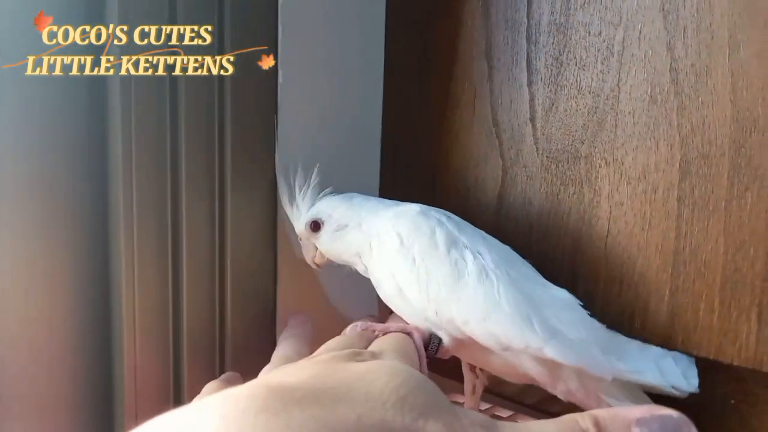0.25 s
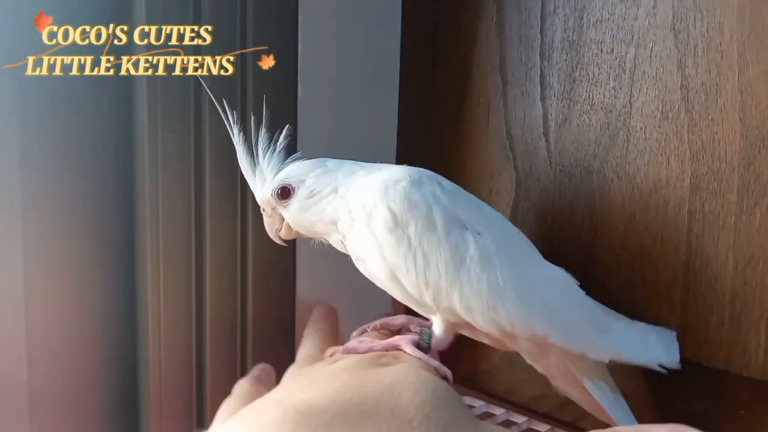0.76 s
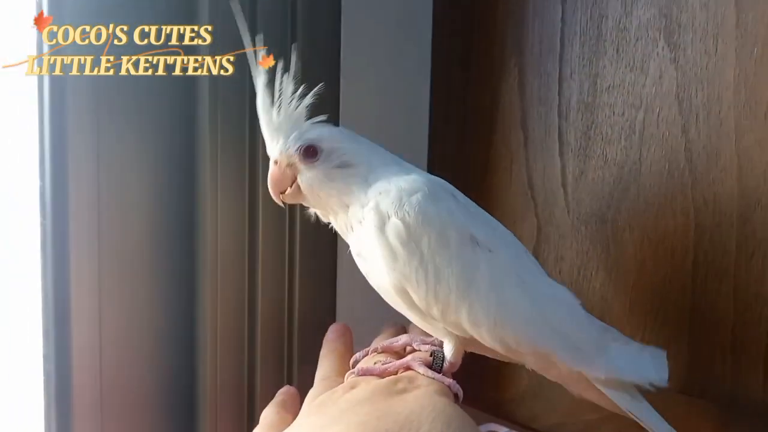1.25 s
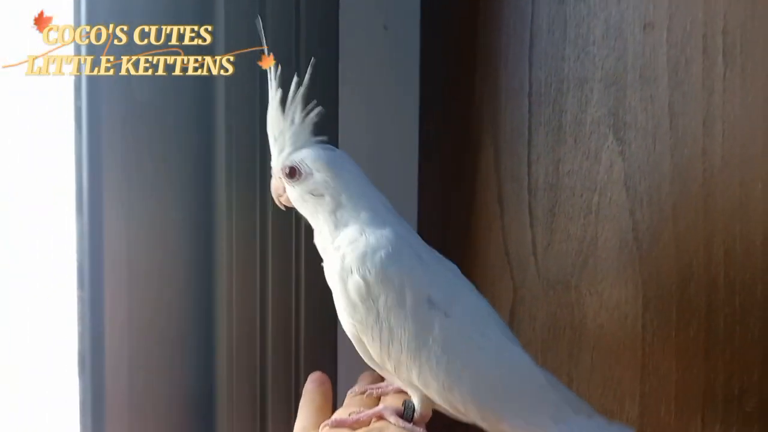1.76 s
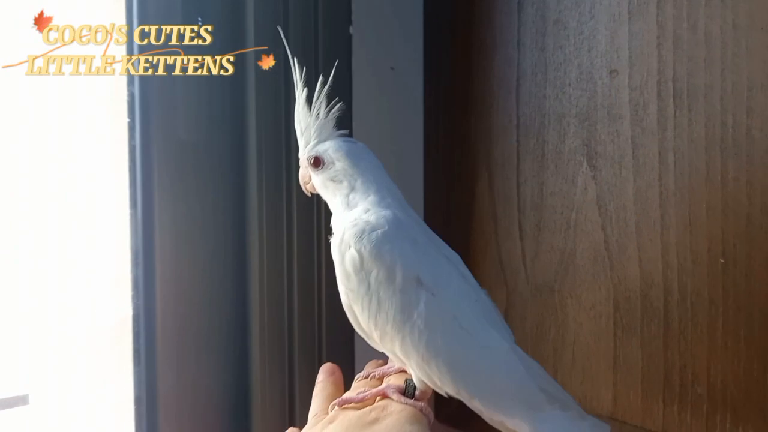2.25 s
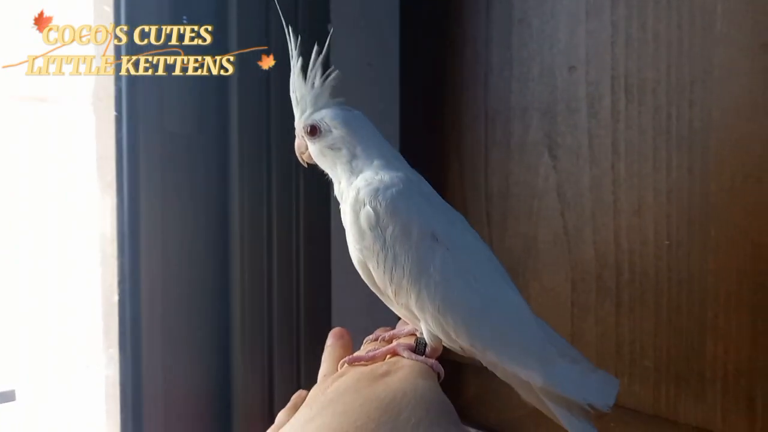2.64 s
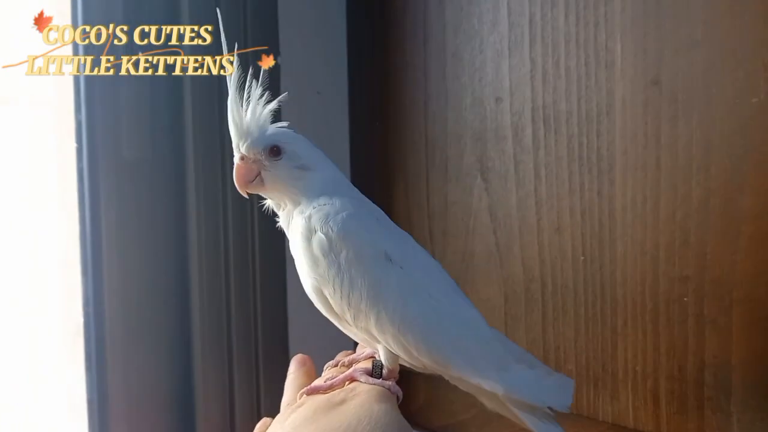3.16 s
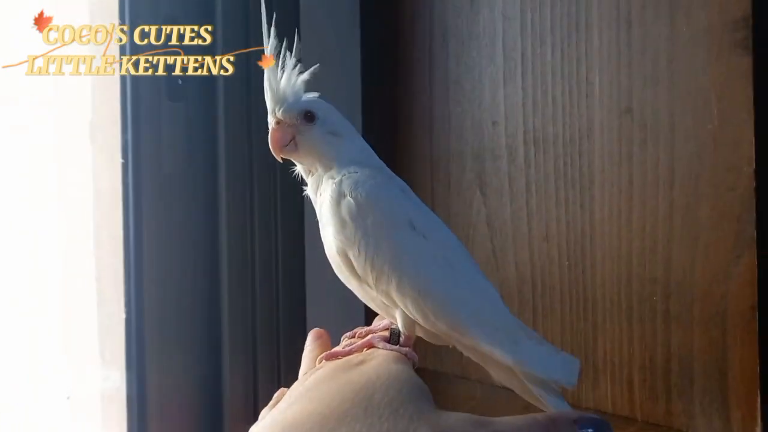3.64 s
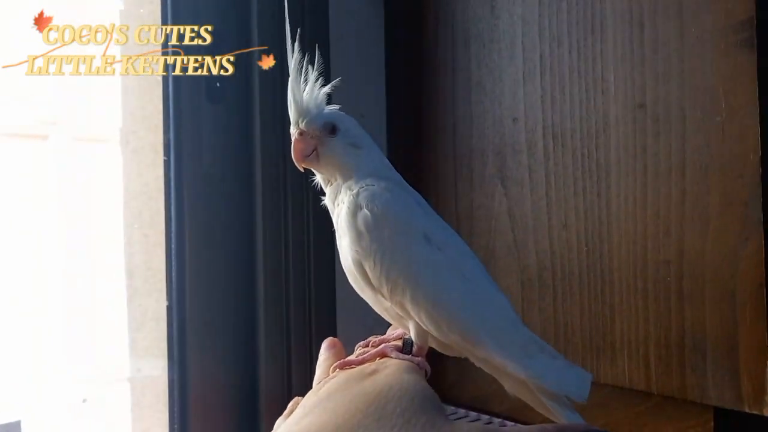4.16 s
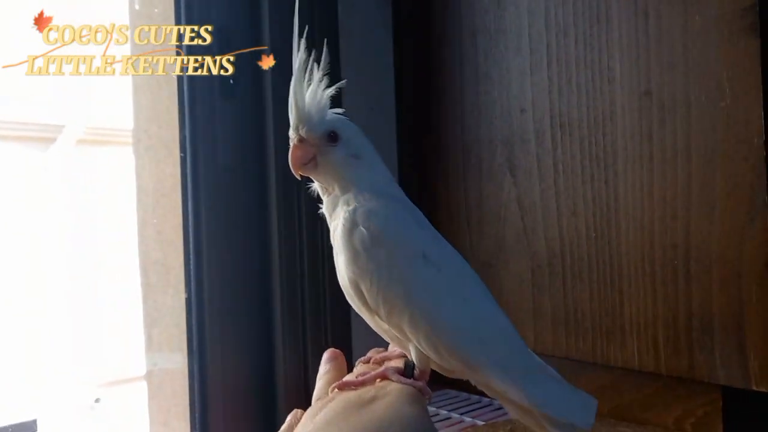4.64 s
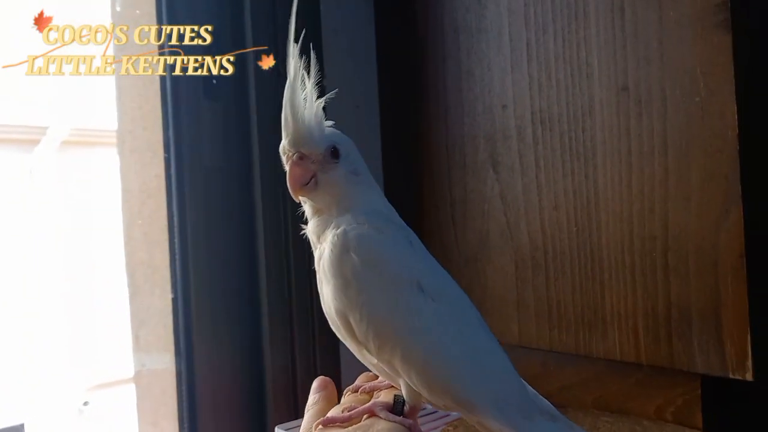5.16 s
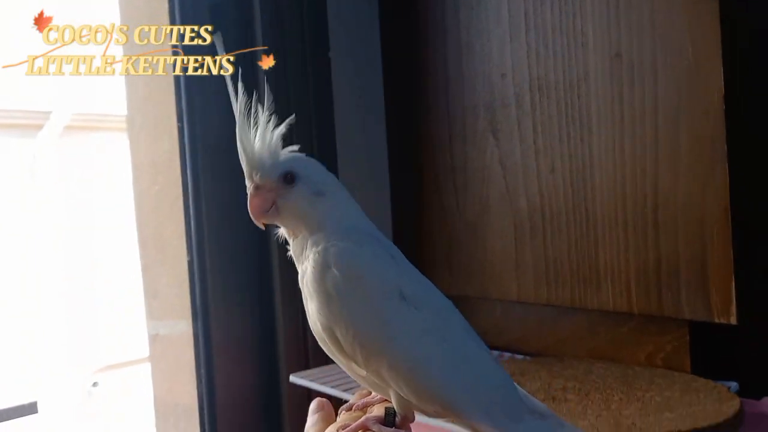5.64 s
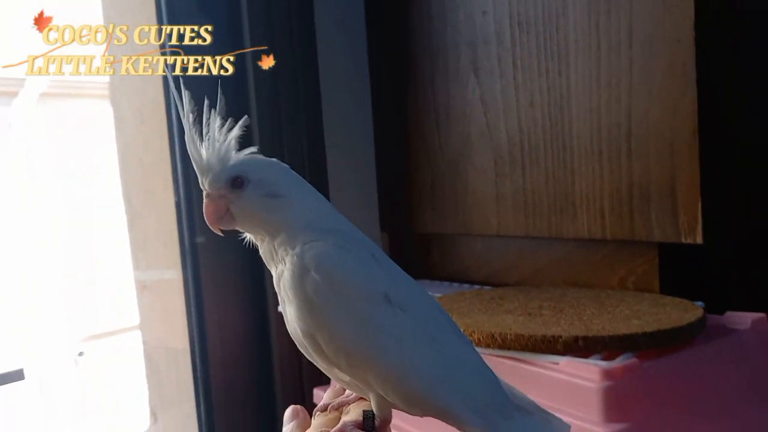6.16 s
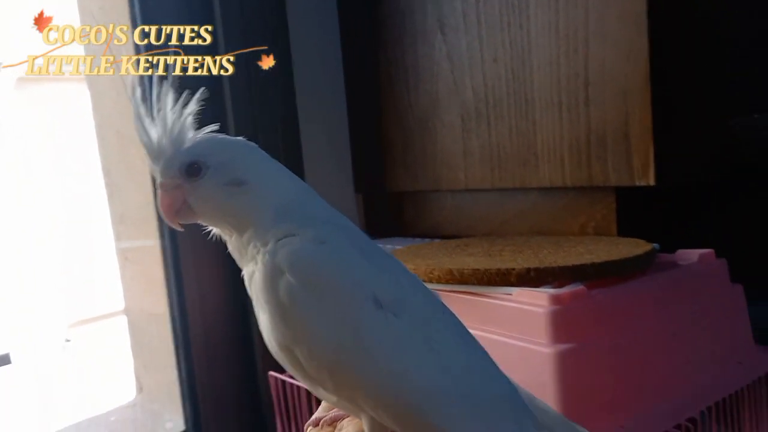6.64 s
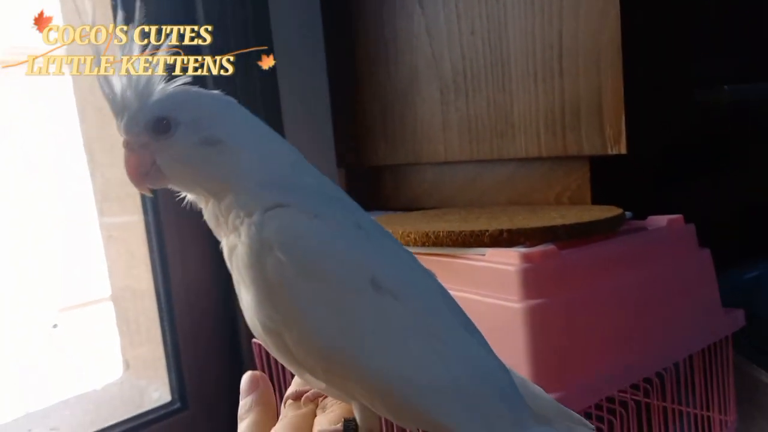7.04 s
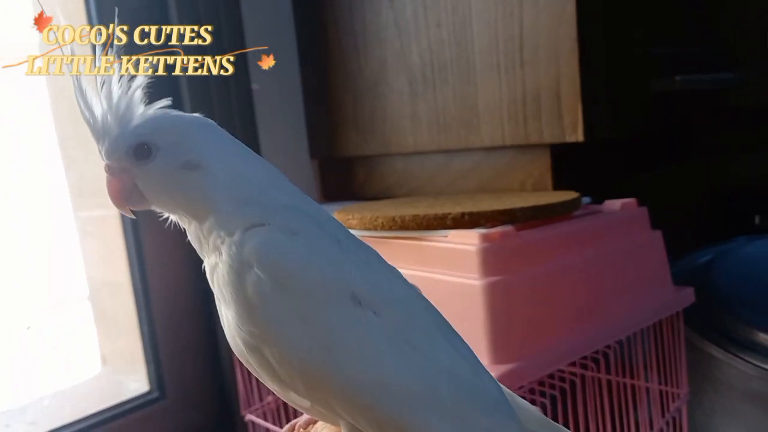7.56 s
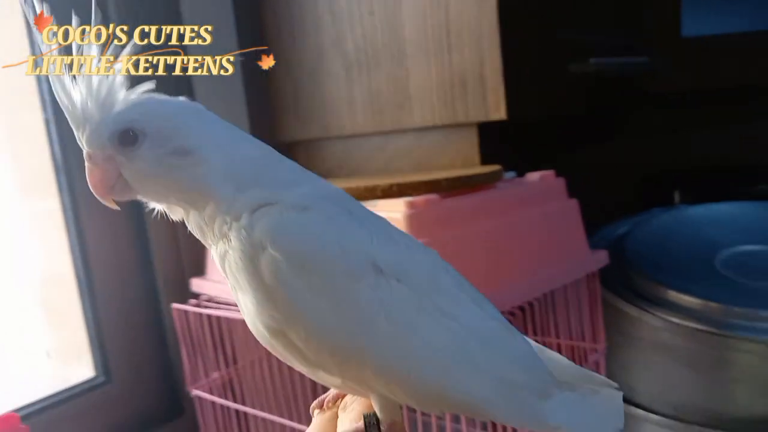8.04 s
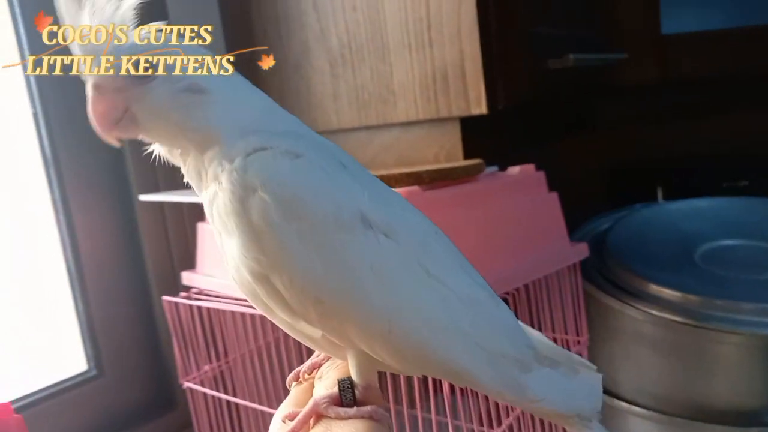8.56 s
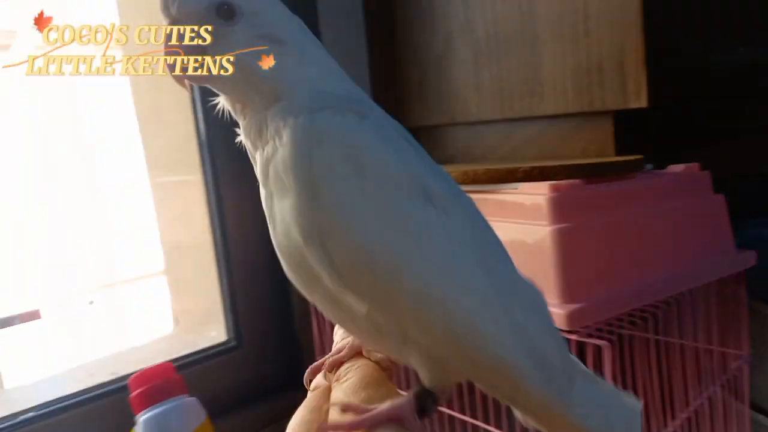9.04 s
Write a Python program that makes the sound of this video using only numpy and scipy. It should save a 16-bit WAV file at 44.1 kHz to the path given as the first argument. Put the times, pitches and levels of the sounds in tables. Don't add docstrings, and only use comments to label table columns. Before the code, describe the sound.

A low motor drone and soft street air fill a hard-walled room, with a few tiny claw scratches at first. Just after one second a close cockatiel starts giving short, loud whistles that sweep up and drop away, nine in all, each with a brief bright echo. The camera microphone dips the background under each call, then lets it swell back.

```python
import sys
import numpy as np
from scipy import signal
from scipy.fft import rfft, irfft, next_fast_len
from scipy.io import wavfile
from scipy.ndimage import uniform_filter1d, map_coordinates

SR = 44100
rng = np.random.default_rng(int(sys.argv[2]) if len(sys.argv) > 2 else 0)


def invert_db(level):
    return 10 ** (np.asarray(level, dtype=float) / 20)


def materialize(psi):
    bounded = np.clip(np.atleast_2d(psi).T, -1, 1)
    quanta = np.round(bounded * 32767).astype(np.int16)
    wavfile.write(sys.argv[1], SR, quanta)


N = 410130


def unit(x):
    return x / np.sqrt(np.mean(x ** 2) + 1e-20)


def along(points, hz):
    point_hz, value = np.transpose(points)
    return np.interp(np.log(hz + 1), np.log(point_hz + 1), value)


def curve(rows):
    return np.interp(np.arange(N) / SR, *np.transpose(rows))


def wobble(rate, count=N):
    knots = rng.standard_normal(count // 100)
    return map_coordinates(knots, [np.arange(count) * rate / SR])


def sides(db):
    return invert_db(np.array([db / 2, -db / 2])).reshape(2, -1)


def rush(response):
    # hz, likeness (-1 to 1)
    likeness = [(60, .995), (130, 0.9), (290, 0.86), (640, 0.54), (1400, -0.12), (15000, 0.038)]
    m = next_fast_len(N + 8192)
    hz = np.fft.rfftfreq(m, 1 / SR)
    turn = np.arccos(np.clip(along(likeness, hz), -1, 1)) / 2
    spectra = rfft(rng.standard_normal((2, m))) * response(hz)
    mid, side = irfft(spectra * [np.cos(turn), np.sin(turn)], m)[:, :N]
    return unit(np.array([mid + side, mid - side]))


def drone():
    # pitch_hz, width_hz, sill_level_db, pane_level_db, left_right_db
    resonances = [(57.3, 5.2, -44.5, -46, 0), (105.45, 4, -31.5, -27, 1.5), (142.8, 5.6, -27, -33.5, 5),
                  (202.2, 3.4, -32, -43, 0), (255.2, 15, -37, -32.5, -0.3), (308.6, 14, -37, -34, -0.5),
                  (375, 27, -47, -38.5, -2), (464.2, 13, -42.5, -45, 6.5)]
    # time_s, height (0 sill, 1 pane)
    lift = [(0, 0.12), (1.2, 0), (2.5, 0.48), (5, 0.96), (9.3, 1)]
    height = np.clip(curve(lift), 0, 1)
    out = np.zeros((2, N))
    for peak_hz, width_hz, low_db, high_db, pan_db in resonances:
        def ring(f):
            resonance = f * width_hz / np.abs(peak_hz ** 2 - f * f + 1j * f * width_hz)
            return resonance * (np.abs(f - peak_hz) < 6 * width_hz)

        level_db = low_db + (high_db - low_db) * height
        out += invert_db(level_db) * sides(pan_db) * rush(ring)
    return out


def air():
    # hz, level_db per Hz
    street = [(25, -72), (42, -35), (55, -6), (110, -7.5), (300, -3), (520, -14), (700, -11), (1250, -17),
              (2500, -15), (5300, -30.5), (8100, -32), (11000, -39), (13500, -45), (16000, -55)]
    # pitch_hz, width_hz, level_db
    whine_hz, width_hz, whine_db = (15100, 100, -46.5)
    whine = invert_db(whine_db) * rush(lambda f: np.exp(-.5 * ((f - whine_hz) / width_hz) ** 2))
    breathing = invert_db(.5 * wobble(2.5) + .4 * wobble(12))
    return invert_db(-29.5) * breathing * rush(lambda f: invert_db(along(street, f))) + whine


def claws():
    # start_s, level_db
    ticks = [(.085, -25), (.23, -24), (.305, -36), (.37, -32), (.415, -23), (.48, -24.5), (.67, -23.5),
             (1.17, -28), (8.3, -22), (8.552, -27)]
    rise_s, t60_s = 0.0017, 0.018
    t = np.arange(2000) / SR
    out = np.zeros((2, N + len(t)))
    for start_s, level_db in ticks:
        start = round(start_s * SR)
        scratch = invert_db(level_db - 60 * t / t60_s) * (1 - np.exp(-t / rise_s))
        out[:, start:start + len(t)] += scratch * rng.standard_normal((2, len(t)))
    bright = signal.butter(2, 9000, "high", fs=SR, output="sos")
    return signal.sosfilt(bright, out[:, :N])


def contour(t, rise, hold, fall, top_hz, first_hz, steps, depth, sag_hz, last_hz):
    # pitch_hz, effort_db
    effort = [(1700, 1.5), (1950, -2.5), (2200, 2.5), (2450, 8.5), (2700, 8.5), (2950, 10.5), (3300, 10.5)]
    # pitch_hz, overtones_db
    brightness = [(1700, -14.5), (1950, 5), (2200, -5), (2450, -16.5), (2700, -16), (2950, -14.5),
                  (3300, -16.5)]
    rise_bend, fall_bend = 1.03, 1.7
    scoop_hz, scoop_s = 70, .006
    up = np.clip(t / rise, 0, 1)
    down = np.clip((t - rise - hold) / fall, 0, 1)
    stairs = up + np.clip(depth, 0, 1) * np.sin(2 * np.pi * steps * up) / (2 * np.pi * steps)
    left = np.clip(1 - stairs / stairs[-1], 0, 1)
    hz = top_hz - (top_hz - first_hz) * left ** rise_bend
    hz -= (top_hz - sag_hz - last_hz) * down ** fall_bend
    hz -= sag_hz * np.clip((t - rise) / hold, 0, 1)
    hz -= scoop_hz * np.exp(-t / scoop_s)
    return hz, along(effort, hz) + 3 * down, along(brightness, hz) - 7.5 * down


def throat_db(hz):
    # hz, gain_db
    throat = [(1200, -29), (2000, -3.5), (3200, 2.5), (4200, -5.5), (5400, -12), (6500, -16.5),
              (7400, -6.5), (8600, -12), (9800, -8), (10600, -8), (11800, 2.5), (13200, 7), (14200, -7),
              (15500, 9.5)]
    return along(throat, hz)


def whistle(arch, shape, tire_db, push_db, open_db, tilt_db, rasp):
    # multiple, level_db, share of the brightness it follows
    overtones = [(2, 0, 0.63), (3, -7, 0.74), (4, -14.5, 1), (5, -28, 0.46), (6, -40.5, 0.27), (7, -41, .8),
                 (8, -38, 0.54)]
    attack_s, release_s = .004, 0.00067
    kick_db, kick_s = 0, 0.006
    t = np.arange(SR // 2) / SR
    count = len(t)
    call_s, top_hz = sum(arch[:3]), arch[3]
    hz, effort_db, bright_db = contour(t, *arch, *shape)
    roughness = .007 * rasp * (1 + 2 * np.exp(-t / .04))
    tremble = .003 * wobble(60, count) + roughness * wobble(350, count)
    hz = uniform_filter1d(hz, size=400, mode="nearest")
    bright_db += open_db - 0.16 * np.clip(-np.gradient(hz, t) / 1000, 0, 30)
    hz *= 1 + tremble
    phase = 2 * np.pi * np.cumsum(hz) / SR
    tone = invert_db(throat_db(hz)) * np.sin(phase)
    for k, db, share in overtones:
        flutter_db = np.minimum(rasp * (5 * wobble(120, count) + 5 * wobble(600, count)), 4)
        level_db = db + share * bright_db + (k - 2) * tilt_db + throat_db(k * hz) + flutter_db
        tone += invert_db(level_db) * np.sin(k * phase) * (k * hz < SR / 2.2)
    breath_db = -21 + 3.6 * tilt_db + 1.4 * bright_db
    puffs = rng.standard_normal(count) * (1 + np.cos(phase)) * rasp * invert_db(breath_db)
    f = np.fft.rfftfreq(count, 1 / SR)
    tone += irfft(rfft(puffs) * invert_db(throat_db(f)) * (f > 3400), count)
    edges = np.clip(t / attack_s, 0, 1) * np.clip((call_s - t) / release_s, 0, 1)
    effort_db = effort_db + kick_db * np.exp(-t / kick_s)
    effort_db += push_db * np.clip((hz / top_hz - .85) / 0.23, 0, 1)
    effort_db += 1.2 * wobble(81, count) - tire_db * (t / call_s - .5)
    return tone * edges * invert_db(effort_db)


def room(early_db, early_t60):
    # hz, t60_s
    walls = [(1500, 0.56), (3000, 0.49), (4500, 0.57), (7000, 0.46), (12000, 0.3)]
    hz, t, z = signal.stft(rng.standard_normal((2, SR)), SR, nperseg=256)
    fade = invert_db(-60 * t / along(walls, hz)[:, None]) + invert_db(early_db - 60 * t / early_t60)
    tail = signal.istft(z * fade, SR, nperseg=256)[1][:, :SR]
    return np.pad(tail / np.linalg.norm(tail[0]), ((0, 0), (130, 0)))


def bird():
    # start_s, rise_s, hold_s, fall_s, top_hz
    whistles = [(1.246, .12, .01, .071, 3370), (1.492, .092, .07, .03, 2990), (2.12, .09, .065, .09, 3140),
                (3.098, .112, .048, .087, 3190), (3.787, .113, .1, .05, 3165),
                (4.79, .112, .075, .068, 3200), (5.388, .142, .04, .06, 3216),
                (6.692, .105, .12, .045, 3360), (8.956, .115, .068, .062, 2990)]
    # first_hz, steps in the rise, step depth (0-1), sag_hz over the hold, last_hz
    shapes = [(1930, 2.5, .98, 0, 1950), (2050, 1.5, .8, 90, 1500), (1750, 1.5, 0, -230, 1560),
              (1860, 2.5, .2, -90, 1630), (1740, 2.5, .2, -110, 1630), (1780, 2, .3, 0, 1800),
              (1790, 2.5, .3, 60, 1560), (1780, 2, 0, 170, 1900), (1950, 1.5, .75, -70, 1800)]
    # tire_db over the call, push_db at the top, brightness_db, tilt_db added per multiple above 2,
    # rasp (0-1)
    manners = [(-1, -13.5, -2.5, 2.5, 0.53), (4, -2.5, -1.5, 0, 0.94), (6, -2, -1.5, 2.3, 0.8),
               (3.5, -4, -2.5, 2.2, 0.77), (6.5, -1.5, 1.1, .3, 0.87), (2.2, -2.5, 2.3, -1.3, 0.9),
               (3, -6, 5.5, -1.7, 0.78), (8, 5, 2.5, -0.2, 0.91), (-0.2, -4.8, -3.5, 2.9, 0.5)]
    # straight_db, room_db, room_left_right_db
    beak = [(-8, -9, -4), (-13, -10, -5), (-25, -7.5, -4), (-13.5, -6, -5.5), (-15.5, -6.5, -5),
            (-18.5, -5.5, -4.5), (-17, -5.5, -5.5), (-25, -6.5, -4), (-22.5, -5.5, -5)]
    out = np.zeros((2, N + 2 * SR))
    for (start_s, *arch), shape, manner, aim in zip(whistles, shapes, manners, beak):
        straight_db, room_db, room_pan_db = aim
        start = round(start_s * SR)
        voice = whistle(arch, shape, *manner)
        echo = signal.fftconvolve(voice[None], room(early_db=-16.5, early_t60=0.02), axes=1)
        out[:, start:start + len(voice)] += invert_db(straight_db) * sides(1.5) * voice
        out[:, start:start + echo.shape[1]] += invert_db(room_db) * sides(room_pan_db) * echo
    return out[:, :N]


def slow_gain_db(level_db):
    open_db, cut_depth_db, loud_db = 3, 9.5, -12
    lag_s, hold_s, recover_db_per_s = 0.039, 1.013, 21
    t = np.arange(N) / SR
    since_loud = t - np.maximum.accumulate(np.where(level_db > loud_db, t, -99))
    recovered_db = recover_db_per_s * np.maximum(since_loud - hold_s, 0)
    cut_db = np.clip(cut_depth_db - recovered_db, 0, None)
    keep = np.exp(-1 / (lag_s * SR))
    return open_db - signal.lfilter([1 - keep], [1, -keep], cut_db)


def scene():
    return drone() + air() + claws() + bird()


def roll_off(x):
    return signal.sosfilt(signal.butter(12, 15950, fs=SR, output="sos"), x)


def record(dry):
    knee_db, slope, follow_s = -15, .55, 0.0068
    keep = np.exp(-1 / (follow_s * SR))
    power = signal.lfilter([1 - keep], [1, -keep], np.mean(dry ** 2, axis=0))
    level_db = 10 * np.log10(power + 1e-9)
    duck_db = slope * np.maximum(level_db - knee_db, 0)
    x = dry * invert_db(slow_gain_db(level_db) - duck_db)
    x = x / (1 + np.abs(x / .99) ** 6) ** (1 / 6)
    band_limit = signal.ellip(8, .2, 70, 15700, fs=SR, output="sos")
    return roll_off(signal.sosfilt(band_limit, x))


dry = scene()
out = record(dry)
materialize(out)
```